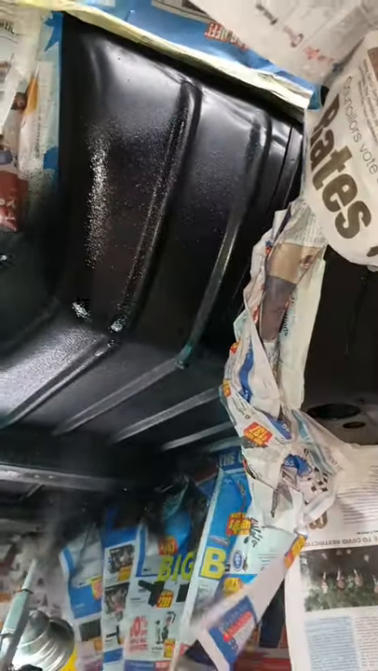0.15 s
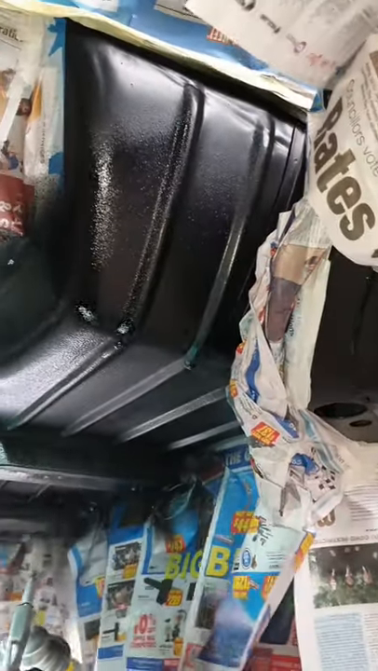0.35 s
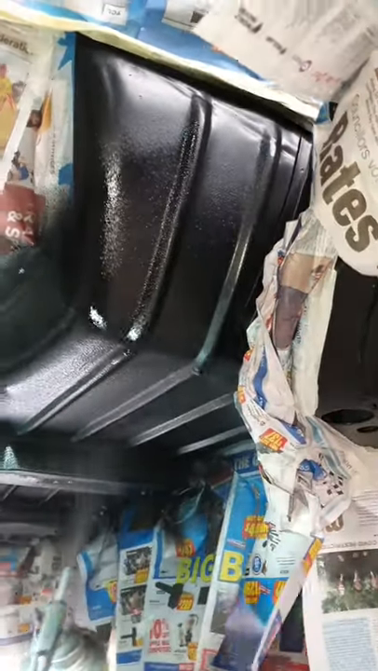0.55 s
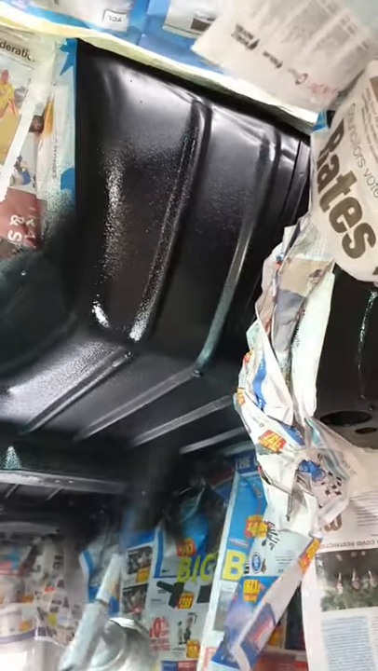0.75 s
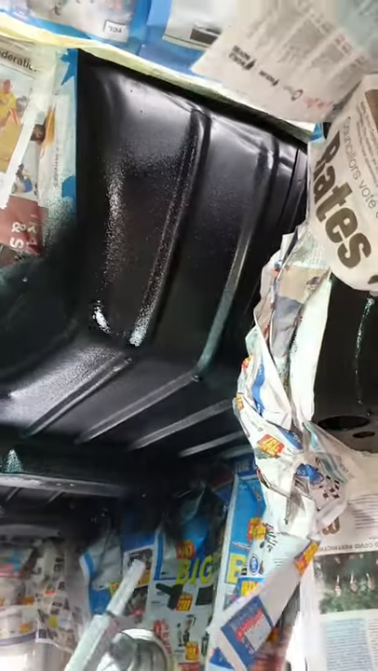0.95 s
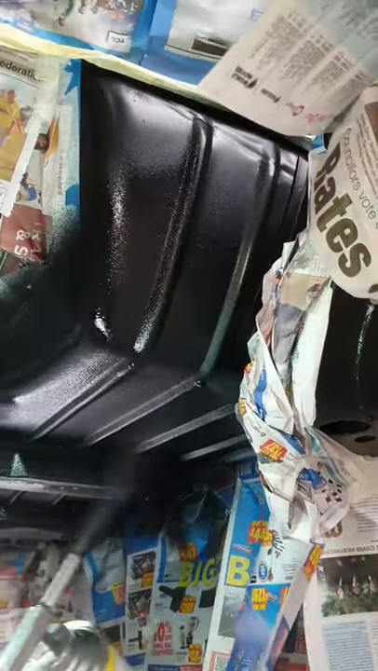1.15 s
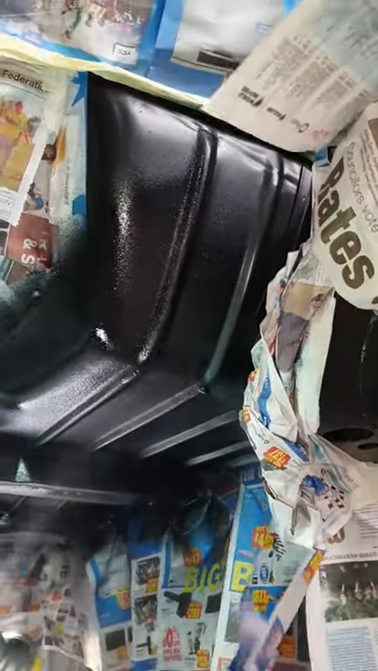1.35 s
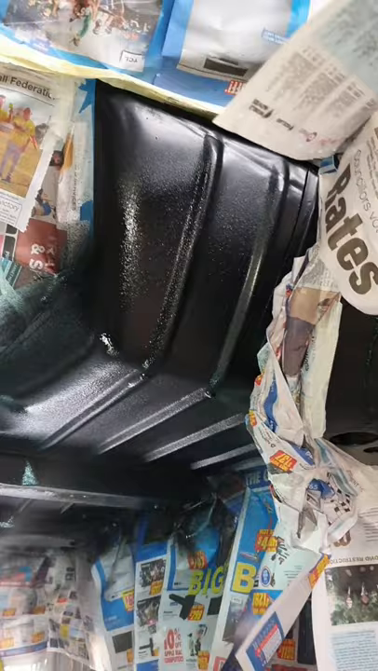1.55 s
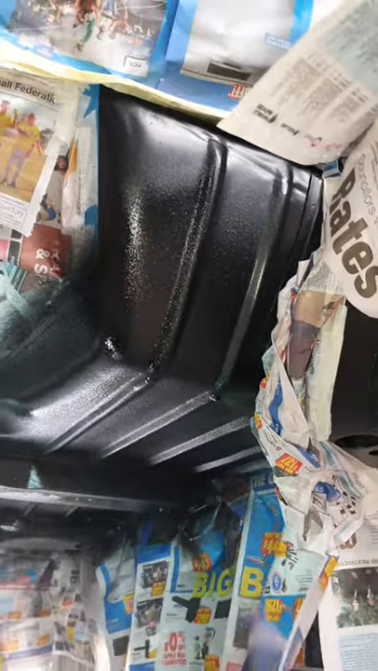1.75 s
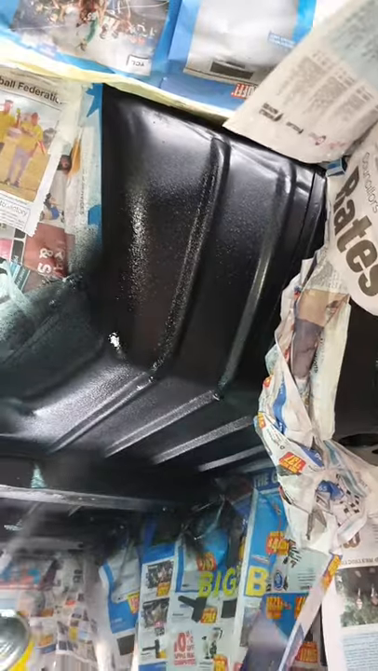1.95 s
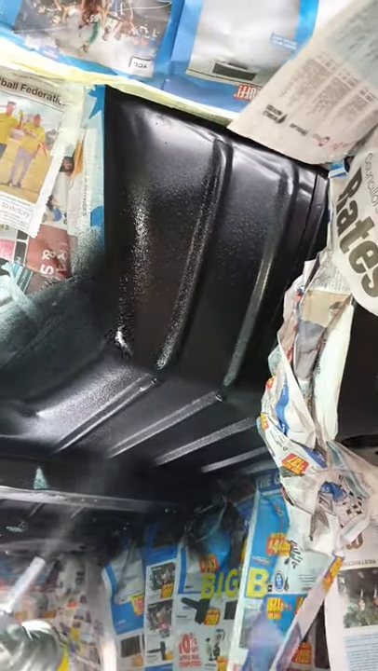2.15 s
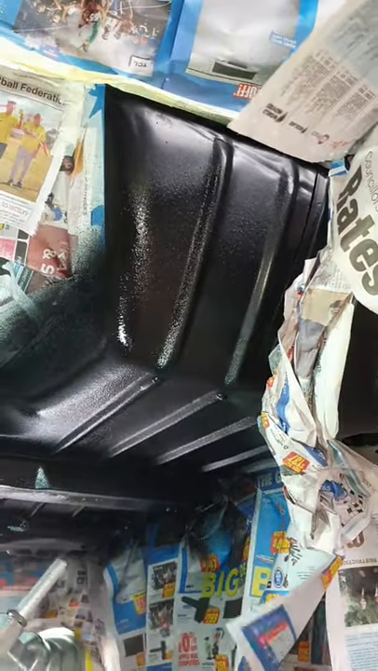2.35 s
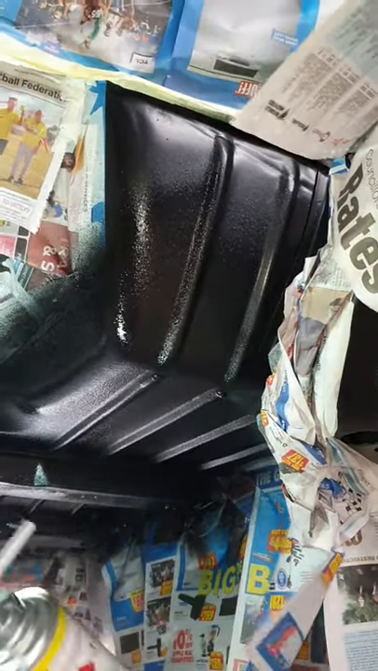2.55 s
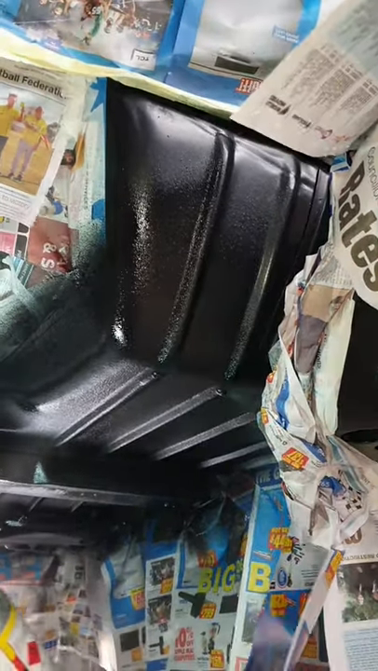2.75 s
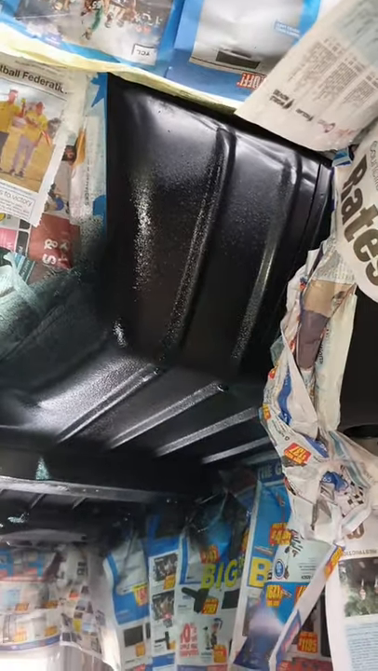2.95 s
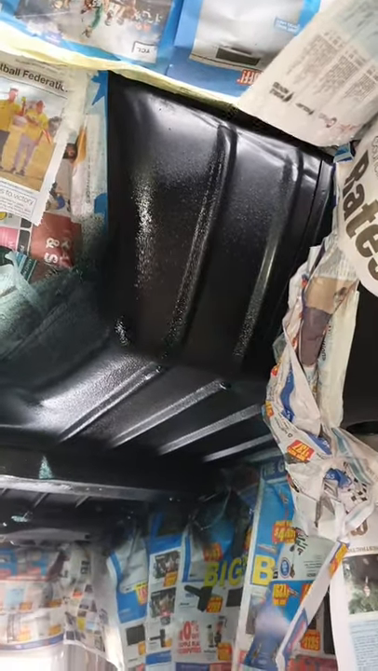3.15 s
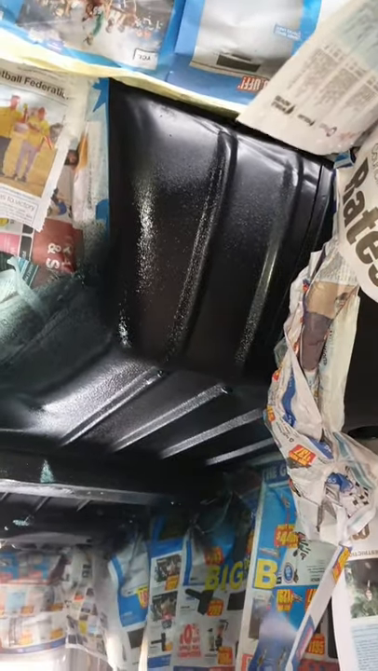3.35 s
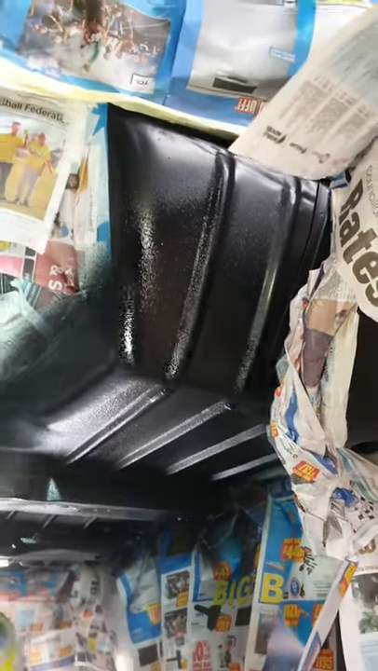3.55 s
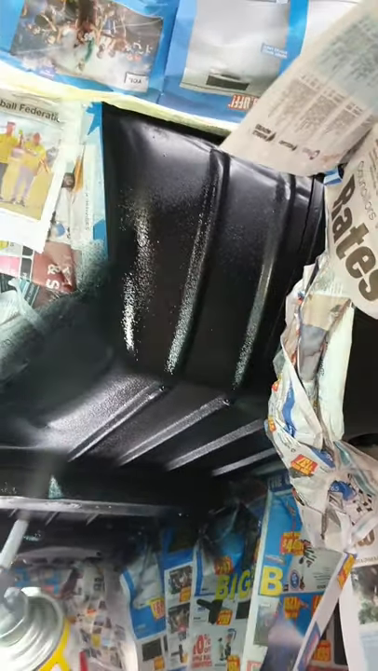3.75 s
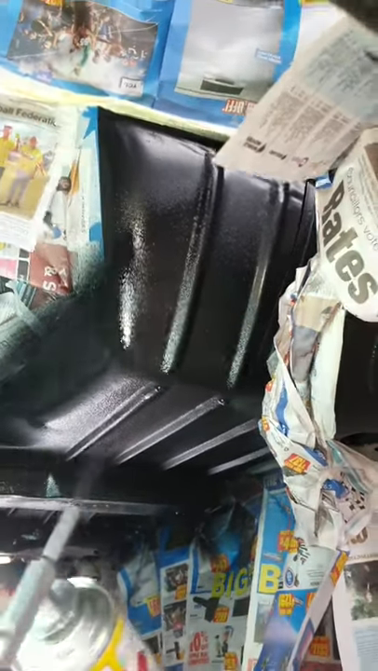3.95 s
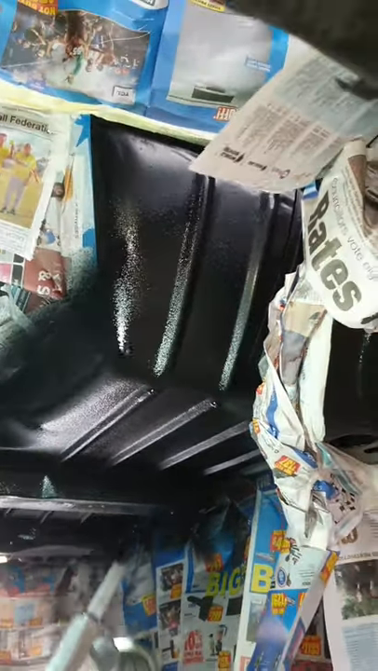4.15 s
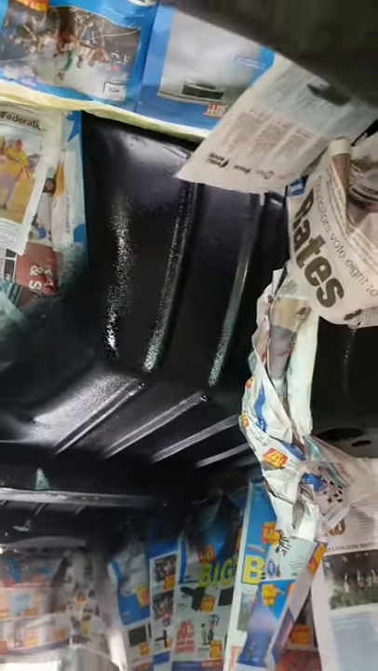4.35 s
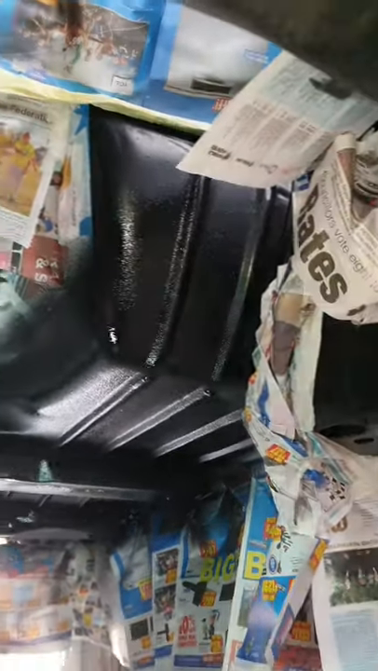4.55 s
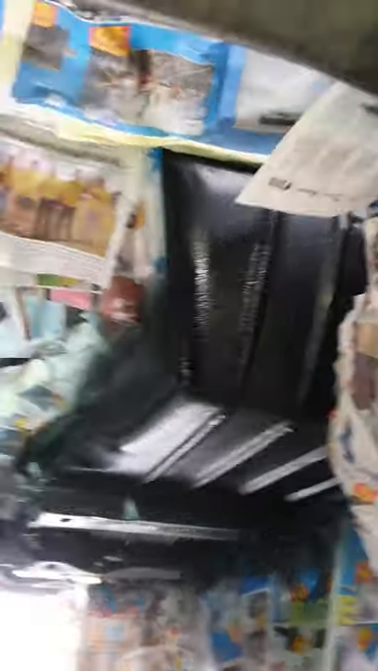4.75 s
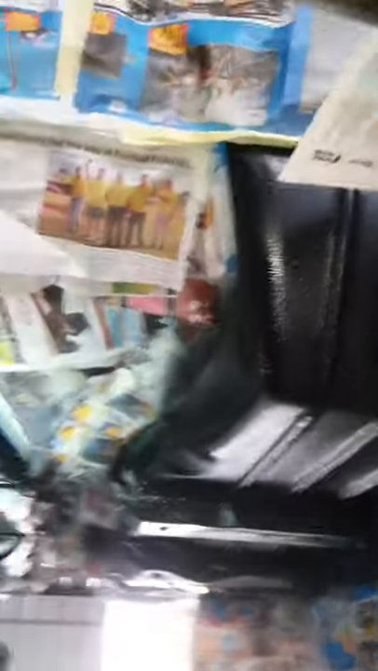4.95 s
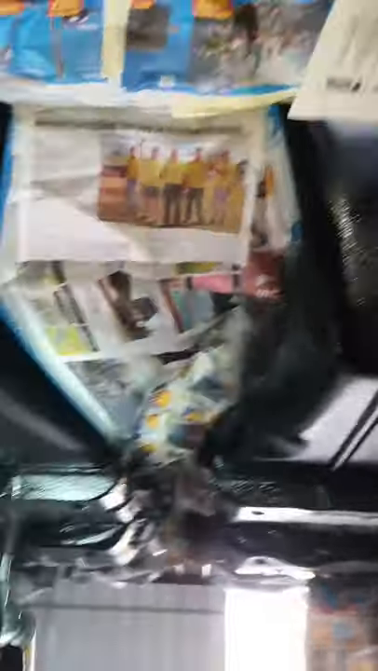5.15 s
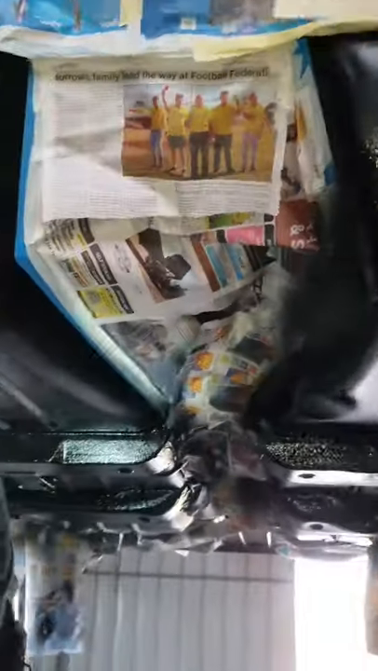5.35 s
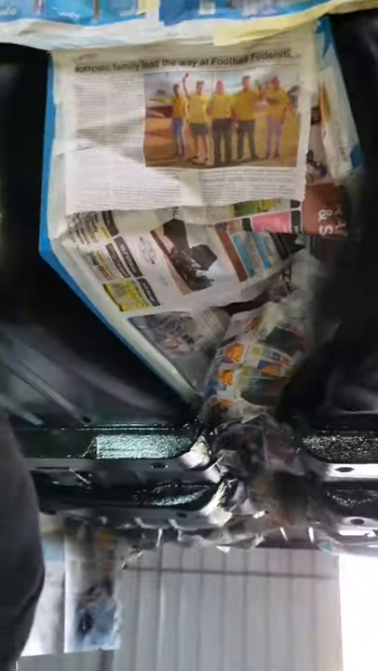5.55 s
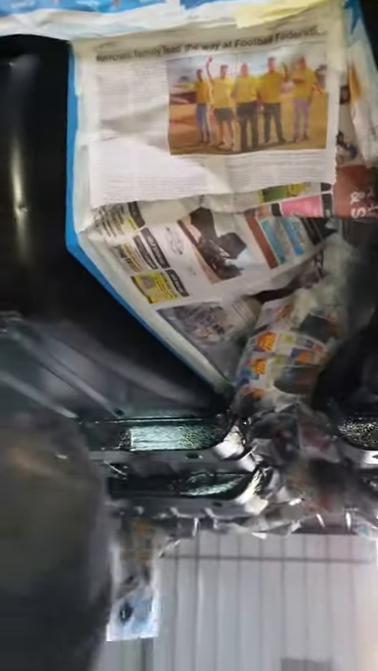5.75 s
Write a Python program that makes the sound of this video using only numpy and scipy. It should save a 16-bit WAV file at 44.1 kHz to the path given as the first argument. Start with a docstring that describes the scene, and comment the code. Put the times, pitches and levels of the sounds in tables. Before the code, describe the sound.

A piston compressor hums and throbs in the background of a garage, with softly rushing air. Close up, a spray can hisses on and off seven times inside a wheel well, about half a second at a time, its tone shifting slightly as the hand sweeps. Two light ticks fall in the longer gap before the last burst. At the end come dull microphone handling and a growing sleeve rustle.

```python
"""In a garage, an aerosol can sprays underbody coating into a car's wheel well in seven hissing bursts.
The hand sweeps the can about, so echoes off the near panels slide through the hiss, and the garage
rings on after each burst. Further off, a piston compressor throbs over a soft rush of air.
Near the end come two light ticks, then a hand rubs and a sleeve rustles as the microphone swings aside."""
import sys
import numpy as np
from scipy import signal
from scipy.fft import rfft, irfft, next_fast_len
from scipy.io import wavfile

SR = 44100
rng = np.random.default_rng(int(sys.argv[2]) if len(sys.argv) > 2 else 0)


def master_out(mix):
    """Clip the mix to full scale and print it as 16-bit PCM to the path in sys.argv[1]."""
    frames = np.transpose(np.atleast_2d(mix))
    ceiling = np.clip(frames, -1, 1)
    pcm = np.round(ceiling * 32767).astype(np.int16)
    wavfile.write(sys.argv[1], SR, pcm)


N = 255339
TIME = np.arange(N) / SR
FREQS = np.maximum(np.fft.rfftfreq(N, 1 / SR), 1)
SIDES = np.array([[1], [-1]])   # plus for left, minus for right

# The rushing air of compressor and garage. Each row: pitch in Hz, relative level in dB.
AIR_SPECTRUM = [(20, -16), (55, -6.5), (85, 2.5), (135, -8), (200, -3), (370, 0), (600, -1), (820, -5),
                (950, -11.5), (1400, -11.5), (1650, -15.5), (4000, -21), (11500, -31), (16000, -30)]
# How alike the room sounds on both sides. Each row: pitch in Hz, likeness (1 is alike), left lead in dB.
STEREO_LIKENESS = [(60, 0.997, -1), (135, 1, -2), (290, 0.89, 0.5), (640, 0.24, 0), (1380, 0.12, -1),
                   (3000, 0.05, 1)]
# The compressor's main tones. Each row: multiple of the crank's speed, relative level in dB.
CRANK_TONES = [(4, -52), (5, -49), (6, -55.5), (9, -55.5), (10, -52), (12, -58.5), (13, -50), (14, -42),
               (17, -49.5), (18, -49.5), (19, -58), (23, -61), (24, -53), (25, -52), (26, -59.5),
               (30, -49.5), (31, -59), (35, -58.5), (37, -72), (41, -59.5), (43, -53), (44, -74)]
# Its other, fainter tones. Each row: pitch in Hz, relative level in dB.
FAINT_TONES = [(130, -70), (300, -65.5), (560, -60), (830, -65.5), (950, -65.5), (1150, -70), (1400, -68.5),
               (1500, -64)]
# How the hum rises and falls. Each row: time in seconds, level change in dB.
HUM_CHANGES = [(0, 2), (2.5, 0.5), (4.8, 1), (5.3, -2.5), (5.79, 5)]
# Light ticks in the long pause. Each row: start in seconds, level in dB.
LIGHT_TICKS = [(4.398, -50), (4.675, -53)]
# The hand rubbing on the microphone. Each row: pitch in Hz, relative level in dB.
RUB_SPECTRUM = [(40, -27), (82, 11), (120, -11), (170, 6.5), (270, -9), (410, 3.5), (800, -2), (1500, -15),
                (4000, -35)]
# The rustling sleeve. Each row: pitch in Hz, relative level in dB.
RUSTLE_SPECTRUM = [(300, -33), (1000, -1.5), (2000, -2), (4000, -8), (8000, -17), (16000, -24)]
# How long the garage rings. Each row: pitch in Hz, seconds to fade by 60 dB.
GARAGE_RING = [(500, 0.95), (2000, 0.84), (5000, 0.74), (9000, 0.57), (15000, 0.28)]
# The hiss of the jet. Each row: pitch in Hz, relative level in dB.
JET_SPECTRUM = [(150, -29), (400, -11), (800, -9), (1200, -4), (1750, -5.5), (2100, -3.5), (4000, 2),
                (8000, 0.5), (16000, -1)]
# Presses of the nozzle, each a stroke past another hollow in the bodywork. Each row: start, stop,
# opening time and closing time in seconds, relative level in dB, swell in dB (a sag if negative),
# swing to the left in dB, brightness in dB per octave, the hollow's pitch in Hz, its boost in dB.
PRESSES = [(-0.05, 0.187, 0.01, 0.012, -20, -1.8, -1.5, 0.76, 2080, 1.5),
           (0.355, 0.791, 0.018, 0.012, -21, -1.3, 3, 1, 6300, 0.5),
           (1.061, 1.492, 0.022, 0.029, -21, -1.5, -0.2, 1, 4550, 3.5),
           (1.705, 2.22, 0.0016, 0.016, -19.5, 1.8, 1.4, 0.9, 3500, 2.5),
           (2.52, 2.975, 0.019, 0.029, -21, -1.9, -0.5, 1.14, 4000, 1),
           (3.255, 3.889, 0.0036, 0.01, -19.5, 2.2, 2.5, 1, 3280, 2.5),
           (4.883, 5.51, 0.02, 0.055, -19.5, 5.5, 2.5, 0, 6060, 3)]
# The microphone's two openings, or ports. Each row: pitch in Hz, left boost in dB, right boost in dB.
PORT_COLOUR = [(1350, 0.5, -1.5), (2070, 4, 3), (2900, 4.5, -8.5), (3730, 3.5, -4.5), (5140, 3, 0),
               (6190, 6, -15.5), (6880, 8.5, -4.5), (7340, 0, -12.5), (8570, 2, -4), (8830, 2, -0.5),
               (10860, 3, -1.5), (12060, 3.5, 6), (14100, 5, -3), (15600, 6, -9)]

CRANK_HZ = 18.72   # turns a second
KNOCKS, INTAKE = [0.11, 0.345], 0.528   # when they come, as shares of one turn
SWING_AT_S, SWING_RISE_S = 4.884, 0.23   # the microphone starts to move and gets up to speed


def from_db(db):
    """Turn decibels into a number to multiply a sound by."""
    return 10 ** (np.asarray(db) / 20)


def unit_power(x):
    """Scale a sound so that its average power is 1."""
    return x / np.sqrt(np.mean(x ** 2) + 1e-20)


def at_hz(table, hz, column=1):
    """Look up a table at any pitch, blending between its rows."""
    table = np.array(table)
    return np.interp(np.log(hz), np.log(table[:, 0]), table[:, column])


def drift(rate):
    """A smooth random wobble of size about 1 that changes about `rate` times a second."""
    return unit_power(irfft(rfft(rng.standard_normal(N)) / (1 + (FREQS / rate) ** 4), N))


def coloured(x, spectrum):
    """Make each pitch louder or softer, as a table says."""
    return irfft(rfft(x) * from_db(at_hz(spectrum, FREQS)), N)


def room_noise(spectrum):
    """Stereo noise from all around: alike in the bass, unrelated in the treble."""
    alike = np.clip(at_hz(STEREO_LIKENESS, FREQS), 0, 1)
    mid, side = rfft(rng.standard_normal((2, N)))
    pair = np.sqrt(1 + alike) * mid + np.sqrt(1 - alike) * side * SIDES
    pair *= from_db(at_hz(STEREO_LIKENESS, FREQS, column=2) / 2 * SIDES)
    return unit_power(coloured(irfft(pair, N), spectrum))


def delayed(x, lags_s):
    """Late copies of a sound, read in fine steps to keep the treble."""
    fine = signal.resample_poly(x, 4, 1)
    fine_time = np.arange(len(fine)) / (4 * SR)
    return [np.interp(TIME - lag, fine_time, fine, left=0, right=0) for lag in lags_s]


def rushing_air(level_db, throb_db):
    """A broad rush that swells as the piston draws in air."""
    piston = np.cos(2 * np.pi * (CRANK_HZ * TIME - INTAKE))
    return from_db(level_db + throb_db * piston) * room_noise(AIR_SPECTRUM)


def compressor(level_db, waver_db, wander_s, scatter_hz):
    """Each turn of the crank brings a deep puff and two knocks: a stack of close tones that throbs."""
    turns = CRANK_HZ * (TIME + wander_s * drift(2.1))
    main_db = dict(CRANK_TONES)
    wavers = [from_db(waver_db * drift(5)) for _ in range(7)]
    hum = np.zeros((2, N))
    for multiple in range(4, 81):
        hz = multiple * CRANK_HZ
        db = main_db.get(multiple, at_hz(FAINT_TONES, hz))
        pan_db = SIDES / 2 * at_hz(STEREO_LIKENESS, hz, column=2)
        strength = np.sqrt(2) * from_db(db + pan_db) * wavers[multiple % len(wavers)]
        # the puff carries the bass, the knocks the rest
        blows = np.array([INTAKE] if hz < 140 else KNOCKS)
        phase = np.angle(np.exp(-2j * np.pi * multiple * blows).sum())
        # the room smears the blows, high tones most, and shifts each tone between left and right
        phase += rng.normal(0, hz / scatter_hz)
        apart = SIDES / 2 * np.arccos(np.clip(at_hz(STEREO_LIKENESS, hz), 0, 1)) * rng.choice([-1, 1])
        hum += strength * np.sin(2 * np.pi * multiple * turns + phase + apart)
    change_db = np.interp(TIME, *np.transpose(HUM_CHANGES))
    return hum * from_db(level_db + change_db)


def ticks(fade_s):
    """Tiny bursts of noise that start sharply and die at once."""
    pulses = sum(from_db(db) * (TIME >= start) * np.exp(-np.abs(TIME - start) / fade_s)
                 for start, db in LIGHT_TICKS)
    return pulses * room_noise(RUSTLE_SPECTRUM)


def hand_rub(moving, level_db):
    """The hand rubs dully and evenly on the microphone while it moves."""
    return moving * from_db(level_db) * room_noise(RUB_SPECTRUM)


def sleeve(moving, start_db, db_per_s, brush_at_s, brush_rise_s, brush_db):
    """A sleeve's grainy rustle grows as it comes closer, until it brushes the microphone."""
    nearing_db = start_db + db_per_s * (TIME - SWING_AT_S)
    touching = np.clip((TIME - brush_at_s) / brush_rise_s, 0, 1)
    grain_db = 0.5 * drift(90)
    return moving * from_db(nearing_db + brush_db * touching + grain_db) * room_noise(RUSTLE_SPECTRUM)


def lingering(flow, ring_s):
    """How much sound a space holds: it fills up, then leaks away by 60 dB in `ring_s`."""
    kept = from_db(-60 / (ring_s * SR)) ** 2
    return np.sqrt(signal.lfilter([1 - kept], [1, -kept], flow ** 2 + 1e-18))


def late_echoes(flow, under_car_db, under_car_ring_s, garage_left_db, garage_right_db):
    """The jet's many late echoes blur into smooth noise: brief under the car, longer in the garage."""
    wash = rfft(room_noise(JET_SPECTRUM))
    edges_hz = [0, 1000, 2000, 3500, 5500, 7500, 10000, 13000, SR / 2]
    under_car = from_db(under_car_db) * lingering(flow, under_car_ring_s)
    echoes = np.zeros((2, N))
    for low, high in zip(edges_hz, edges_hz[1:]):
        ring_s = at_hz(GARAGE_RING, (low + high) / 2)
        garage = from_db([[garage_left_db], [garage_right_db]]) * lingering(flow, ring_s)
        band = irfft(wash * ((FREQS >= low) & (FREQS < high)), N)
        echoes += np.hypot(under_car, garage) * band
    return echoes


def wheel_well(hiss, echo_db, longest_s, sweep_s, sweep_hz, right_lag_s, per_side):
    """Near panels throw the hiss back almost at once; the hand's sweep slides these echoes about."""
    hand_x, hand_y = drift(sweep_hz), drift(sweep_hz)
    heading = rng.uniform(0, 2 * np.pi, (2 * per_side, 1))
    slide_s = sweep_s * (np.cos(heading) * hand_x + np.sin(heading) * hand_y)
    lags_s = rng.uniform(longest_s / 10, longest_s, (2 * per_side, 1)) + slide_s
    right, *echoes = delayed(hiss, [right_lag_s, *lags_s])
    panels = np.reshape(echoes, (2, per_side, N)).sum(axis=1) / np.sqrt(per_side)
    return (np.array([hiss, right]) + from_db(echo_db) * panels) / np.hypot(1, from_db(echo_db))


def stroke(start, stop):
    """How far the hand is through a stroke, from 0 to 1."""
    return np.clip((TIME - start) / (stop - start), 0, 1)


def aim(square_on, start_pan_db, shake_db, shake_hz):
    """A slightly shaky hand steers the jet, changing its level and its left-right balance (pan)."""
    aim_db, pan_db = np.zeros(N), np.zeros(N)
    for start, stop, _, _, level_db, swell_db, swing_db, *_ in PRESSES:
        along = stroke(start, stop)
        off_centre = (along / square_on - 1) ** 2   # zero when the jet points straight at the panel
        aim_db = np.where(TIME >= start, level_db - swell_db * off_centre, aim_db)
        pan_db = np.where(TIME >= start, start_pan_db + swing_db * along, pan_db)
    return aim_db + shake_db * drift(shake_hz), pan_db


def valve(flutter_db, flutter_hz):
    """The flow snaps on and off with the finger; the thick coating makes it flutter a little."""
    opening = sum(np.clip((TIME - start) / rise, 0, 1) * np.clip(1 - (TIME - stop) / fall, 0, 1)
                  for start, stop, rise, fall, *_ in PRESSES)
    return opening * from_db(flutter_db * drift(flutter_hz))


def jet(flow, pivot_hz, hollow_octaves):
    """Swirling gas hisses out of the nozzle; midway through each press a hollow colours the sound."""
    noise = rfft(coloured(rng.standard_normal(N), JET_SPECTRUM))
    hiss = np.zeros(N)
    for start, stop, *_, brightness, hollow_hz, hollow_db in PRESSES:
        bright = noise * from_db(brightness * np.log2(FREQS / pivot_hz))
        boost = from_db(hollow_db / (1 + (np.log2(FREQS / hollow_hz) / hollow_octaves) ** 2))
        plain = unit_power(irfft(bright, N))
        hollow = unit_power(irfft(bright * boost, N))
        facing = np.sin(np.pi * stroke(start, stop)) ** 2
        hiss = np.where(TIME >= start, (1 - facing) * plain + facing * hollow, hiss)
    return flow * hiss


def spray_can(level_db):
    """The can's jet, heard close by in the wheel well and echoing from the space around."""
    aim_db, pan_db = aim(square_on=0.56, start_pan_db=-0.95, shake_db=0.67, shake_hz=9.8)
    flow = from_db(level_db + aim_db) * valve(flutter_db=0.85, flutter_hz=43.8)
    hiss = jet(flow, pivot_hz=7000, hollow_octaves=0.21)
    near = wheel_well(hiss, echo_db=2.5, longest_s=0.007, sweep_s=0.000201, sweep_hz=1.0,
                      right_lag_s=0.00012, per_side=6)
    far = late_echoes(flow, under_car_db=-12.0, under_car_ring_s=0.1,
                      garage_left_db=-7.0, garage_right_db=-9.5)
    return near * from_db(pan_db / 2 * SIDES) + far


def scene():
    """The spray over the compressor's hum, the air and the small sounds of moving about."""
    hum = compressor(level_db=0.07, waver_db=1.2, wander_s=0.00013, scatter_hz=320)
    spray = spray_can(level_db=1.07)
    air = rushing_air(level_db=-39.5, throb_db=0.5)
    moving = np.clip((TIME - SWING_AT_S) / SWING_RISE_S, 0, 1)
    rub = hand_rub(moving, level_db=-36.0)
    rustle = sleeve(moving, start_db=-68.5, db_per_s=30.5,
                    brush_at_s=5.71, brush_rise_s=0.047, brush_db=5.5)
    return air + hum + ticks(fade_s=0.004) + rub + rustle + spray


def record(dry, cutoff_hz=15750):
    """Each microphone port colours the sound in its own way; the highest treble is cut steeply."""
    size = next_fast_len(N + SR // 10)
    hz = np.maximum(np.fft.rfftfreq(size, 1 / SR), 1)
    ports = from_db([at_hz(PORT_COLOUR, hz, column=1), at_hz(PORT_COLOUR, hz, column=2)])
    treble_cut = 1 / np.sqrt(1 + (hz / cutoff_hz) ** 600)
    return irfft(rfft(dry, size) * ports * treble_cut, size)[:, :N]


dry = scene()
out = record(dry)
master_out(out)
```